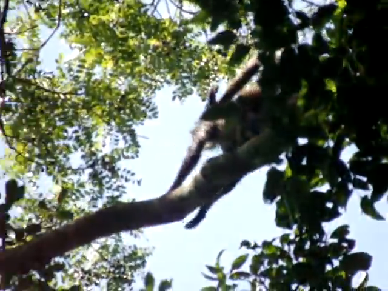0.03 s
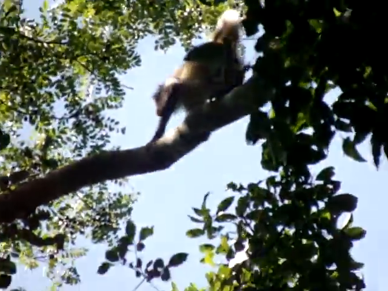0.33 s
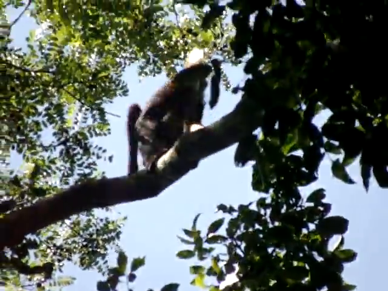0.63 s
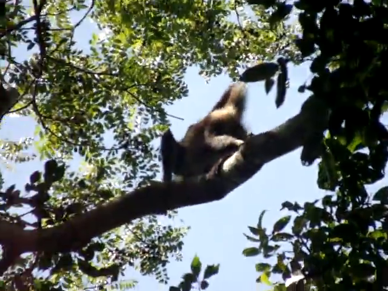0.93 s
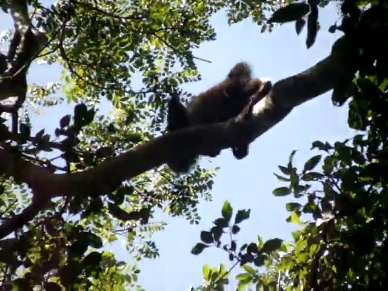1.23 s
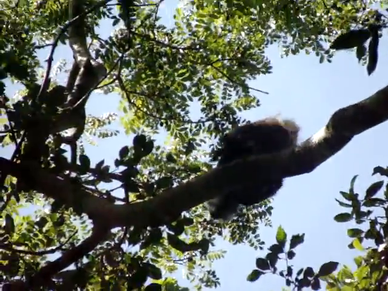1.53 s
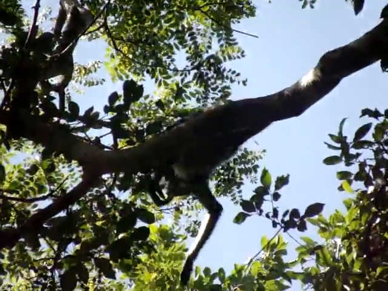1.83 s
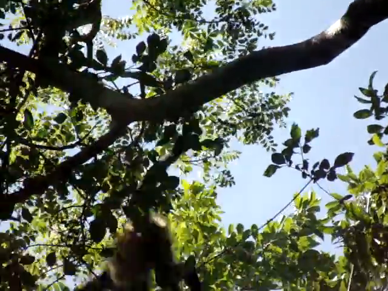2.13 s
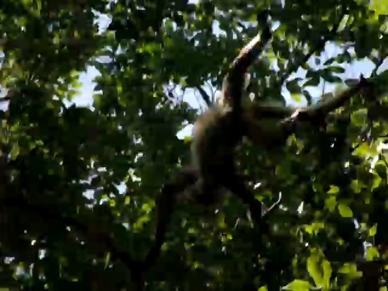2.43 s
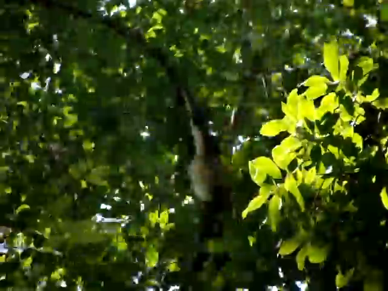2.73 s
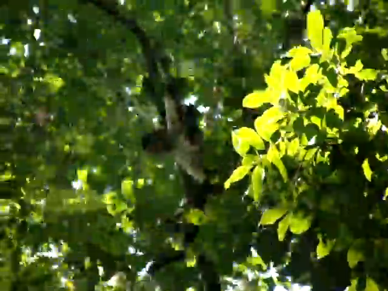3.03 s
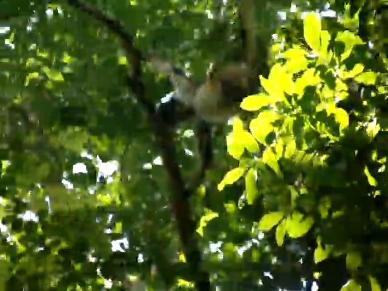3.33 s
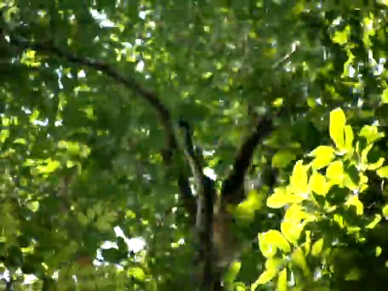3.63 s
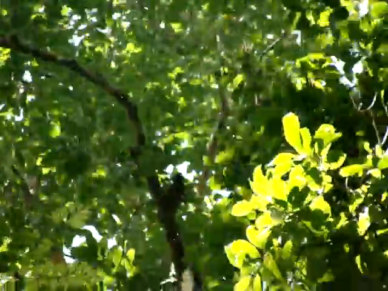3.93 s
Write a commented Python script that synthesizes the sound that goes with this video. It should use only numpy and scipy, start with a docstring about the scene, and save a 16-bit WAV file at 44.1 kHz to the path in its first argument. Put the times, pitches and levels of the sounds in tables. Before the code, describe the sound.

A steady, fluttering cicada buzz, with a few sharp clicks and leaves rustling under a monkey.

```python
"""Cicadas and a monkey in a forest

Cicadas drone: each one's buzz rings near 2 kHz, and echoes among the trees make it flutter.
A monkey runs along a branch and swings into the leaves, which rustle and swish.
Woody ticks and sharp clicks sound close by, over soft forest air and a faint small insect."""
import sys
import numpy as np
from scipy import signal
from scipy.fft import rfft, irfft
from scipy.io import wavfile
from scipy.ndimage import uniform_filter1d, map_coordinates

SR = 44100
rng = np.random.default_rng(int(sys.argv[2]) if len(sys.argv) > 2 else 0)


def generate_wav(sig):
    """Save sig (samples, or channels by samples) to the path in sys.argv[1] as 16-bit PCM at SR."""
    pcm = np.round(np.clip(np.atleast_2d(sig).T, -1, 1) * 32767).astype(np.int16)
    wavfile.write(sys.argv[1], SR, pcm)


N = 176400  # 4 seconds

# tone of the forest air: frequency_hz, gain_db
AIR_TONE = [(20, -20), (50, -8.5), (62, -4), (76, -5.5), (150, -4), (320, 0), (520, -0.5), (615, 4),
            (740, -1), (1050, 2), (1700, -1.5), (3000, -1), (4800, -6.5), (6500, -12.5), (8200, -14.5),
            (10000, -17.5)]
# tone of a soft, low rush in the air: frequency_hz, gain_db
RUSH_TONE = [(120, -24), (280, -3.5), (400, 3), (600, -5), (1200, -25)]
# brief buzzes of a small insect: middle_s, length_s, level_db
INSECT_BUZZES = [(0.327, .22, -63.5), (1.12, 0.11, -62)]
# thin tone of those buzzes: frequency_hz, gain_db
INSECT_TONE = [(7000, -30), (7900, 1), (8200, -8), (8550, 1), (9300, -17)]
# tone of the far cicada chorus: frequency_hz, gain_db
CHORUS_TONE = [(1500, -34), (1830, -6.5), (1920, 4), (2000, 0.5), (2130, 5.5), (2330, 4.5), (2450, -5),
               (2630, -3.5), (2850, -10.5), (3600, -44.5)]
# cicadas that hold one pitch: pitch_hz, start_level_db, end_level_db
STEADY_CICADAS = [(2110, -54, -55.5), (2116, -50.5, -63.5), (2157, -53, -48.5), (2290, -63.5, -55.5),
                  (2366, -65, -55.5), (2374, -61.5, -58), (2568, -60, -57), (2705, -62.5, -58.5)]
# song of the nearest cicada: time_s, pitch_hz, level_db
NEAR_SONG = [(0, 2062, -43), (.3, 2095, -43.5), (.7, 2140, -39.5), (1.0, 2155, -42), (1.2, 2176, -39.5),
             (1.5, 2175, -41.5), (1.7, 2130, -40), (2, 2153, -43), (2.35, 2136, -42), (2.48, 2142, -40.5),
             (2.64, 2149, -40), (2.8, 2144, -47), (2.98, 2152, -37.5), (3.15, 2146, -44),
             (3.55, 2143, -43.5), (3.74, 2147, -41), (4, 2150, -44)]
# the tones in its buzz: multiple_of_buzz_rate, gain_db
NEAR_HARMONICS = [(8, -14.5), (9, -2), (10, -22), (11, -17.5)]
# woody ticks: start_s, level_db, middle_pitch_hz
WOODY_TICKS = [(.164, -35.5, 890), (.5898, -24, 1520), (.772, -34, 1010), (.879, -35, 990),
               (1.063, -38, 1330), (1.2287, -23, 1457), (1.279, -35.5, 1150), (2.2, -36, 770),
               (2.456, -34, 1100), (3.892, -46, 1300)]
# sharp clicks, one much louder than the rest: start_s, level_db
SHARP_CLICKS = [(.733, -38.5), (1.706, -33), (1.71, -16.5), (3.899, -39), (3.917, -43)]
# the tones a click rings with: pitch_hz, gain_db, fade_s
CLICK_RING = [(554, -0.5, 0.0058), (885, -10, 0.013), (2360, -6, 0.017), (3180, -1.5, 0.013),
              (3540, -8.5, 0.016), (4340, -14.5, 0.011), (4820, -2.5, 0.0092), (7210, -15, 0.013),
              (7860, -5.5, 0.0074), (8800, -5.5, 0.01), (9450, -31, .008)]
# how loudly the leaves rustle: time_s, level_db
RUSTLE_LEVELS = [(0, -80), (.55, -58), (.9, -53.5), (1.05, -49.5), (1.25, -62), (1.6, -75), (1.98, -59),
                 (2.13, -46.5), (2.35, -49), (2.55, -46), (2.85, -45), (3.08, -44.5), (3.22, -41.5),
                 (3.45, -45.5), (3.7, -45.5), (4, -51.5)]
# tone of the rustle: frequency_hz, gain_db
RUSTLE_TONE = [(200, -27.5), (700, -7.5), (1600, -10), (3200, 1), (4900, 1), (6500, -7.5), (8000, -12),
               (10000, -14)]
# swishes of whipping branches: start_s, level_db, fade_s
BRANCH_SWISHES = [(2.378, -37, 0.38), (2.653, -36, 0.69), (3.185, -38, 0.22)]
# tone of a swish: frequency_hz, gain_db
SWISH_TONE = [(500, -21), (2000, -7.5), (3700, 2.5), (5200, 2), (7000, -9), (10000, -10)]


def amp(db):
    """Turn decibels into a number to multiply by."""
    return 10 ** (np.asarray(db) / 20)


def unit(x):
    """Scale a signal to an average (rms) level of 1."""
    return x / np.sqrt(np.mean(np.abs(x) ** 2) + 1e-20)


def clock():
    """The time of every sample, in seconds."""
    return np.arange(N) / SR


def curves(rows):
    """Join a table's points with lines: one curve for each column after the time."""
    times, *columns = np.transpose(rows)
    return [np.interp(clock(), times, column) for column in columns]


def wobble(rate_hz):
    """A smooth curve through rate_hz random values a second."""
    return map_coordinates(rng.standard_normal(4096), [clock() * rate_hz + 2], mode="wrap")


def fade(t, fade_s):
    """Die away by 60 dB in fade_s seconds."""
    return np.exp(-np.log(1000) * t / fade_s)


def swell(middle_s, length_s):
    """A smooth rise and fall, loudest at middle_s."""
    return np.exp(-(2 * (clock() - middle_s) / length_s) ** 2)


def colour(x, tone):
    """Shape the lows and highs of x with a tone table, then scale it to level 1."""
    table_hz, table_db = np.transpose(tone)
    hz = np.fft.rfftfreq(N, 1 / SR)
    gain = amp(np.interp(np.log(hz + 1), np.log(table_hz), table_db))
    return unit(irfft(rfft(x) * gain, N))


def patchy_noise(depth_db):
    """Hiss with random louder and softer patches across pitch and time."""
    spectrum = signal.stft(rng.standard_normal(N), nperseg=512)[2]
    patches = uniform_filter1d(rng.standard_normal(spectrum.shape), size=5, axis=0)
    patches = uniform_filter1d(patches, size=7, axis=1)
    return unit(signal.istft(spectrum * amp(depth_db * unit(patches)), nperseg=512)[1][:N])


def add(track, start_s, sound):
    """Mix a sound into the track at start_s."""
    part = track[round(start_s * SR):][:len(sound)]
    part += sound[:len(part)]


def forest_air():
    """The soft wash of the wider forest, with one low rush."""
    wash_db = -48 + 0.21 * wobble(rate_hz=7.66)
    wash = amp(wash_db) * colour(patchy_noise(depth_db=1.6), AIR_TONE)
    rush = swell(middle_s=0.26, length_s=0.37) * colour(rng.standard_normal(N), RUSH_TONE)
    return wash + amp(-55.5) * rush


def small_insect():
    """Short, faint buzzes high above the cicadas."""
    loudness = sum(amp(db) * swell(middle_s, length_s) for middle_s, length_s, db in INSECT_BUZZES)
    return loudness * colour(rng.standard_normal(N), INSECT_TONE)


def echoes(rate_hz):
    """Many echoes added up: a complex curve holding their changing strength and phase."""
    return unit(wobble(rate_hz) + 1j * wobble(rate_hz))


def tone_through_trees(pitch_hz, direct_gain):
    """Echoes boost and cancel a tone, so it flutters. More direct sound means less flutter."""
    flutter = direct_gain + echoes(rate_hz=52.25) + amp(-10.5) * echoes(rate_hz=157.9)
    # keep the average level even over 0.15 s
    flutter /= np.sqrt(uniform_filter1d(np.abs(flutter) ** 2, size=int(0.15 * SR)))
    drift = 0.062 * wobble(rate_hz=8.08)
    cycles = np.cumsum(pitch_hz * np.ones(N)) / SR + drift
    return unit(np.real(flutter * np.exp(2j * np.pi * cycles)))


def cicadas():
    """The nearest cicada speeds up and settles; others hold their pitch over a far chorus."""
    pitch_hz, level_db = curves(NEAR_SONG)
    buzz_hz = pitch_hz / 9  # the loudest tone is 9 times the buzz rate
    nearest = sum(amp(db) * tone_through_trees(buzz_hz * multiple, direct_gain=1.52)
                  for multiple, db in NEAR_HARMONICS)
    others = sum(amp(np.linspace(start_db, end_db, N)) * tone_through_trees(hz, direct_gain=0.71)
                 for hz, start_db, end_db in STEADY_CICADAS)
    chorus = amp(-47) * colour(rng.standard_normal(N), CHORUS_TONE)
    return amp(level_db) * nearest + others + chorus


def woody_ticks():
    """Each tick rings for a few cycles while its pitch drops."""
    rise_s, drop_s = 0.0015, 0.0031
    out, t = np.zeros(N), np.arange(SR // 20) / SR
    pitch_drop = 1 + 0.56 * (np.exp(-t / drop_s) - 0.5)
    for start_s, db, hz in WOODY_TICKS:
        phase = 2 * np.pi * np.cumsum(hz * pitch_drop) / SR
        body = 2 * np.sin(phase) * (1 - np.exp(-(t / rise_s) ** 2))
        overtone = amp(-8.5) * np.sin(2.2 * phase)
        add(out, start_s, amp(db) * fade(t, fade_s=0.015) * (body + overtone))
    return out


def sharp_clicks():
    """Each click is a dry crack with a very short ring and no bass."""
    rise_s, bass_cut_hz = 0.00013, 700
    out, t = np.zeros(N), np.arange(SR // 20) / SR
    for start_s, db in SHARP_CLICKS:
        ring = sum(amp(gain_db) * fade(t, fade_s) * np.sin(2 * np.pi * (hz * t + rng.random()))
                   for hz, gain_db, fade_s in CLICK_RING)
        crack = amp(-2.5) * fade(t, fade_s=0.0081) * rng.standard_normal(len(t))
        add(out, start_s, amp(db) * (1 - np.exp(-t / rise_s)) * (ring + crack))
    return signal.sosfilt(signal.butter(2, bass_cut_hz, "high", fs=SR, output="sos"), out)


def leaves_touching():
    """Leaves brush together softly, with sharper crackles mixed in."""
    crackles_per_s, spread_db = 2000, 1
    crackles = (rng.random(N) < crackles_per_s / SR) * rng.standard_normal(N)
    crackles *= amp(spread_db * rng.standard_normal(N))
    return patchy_noise(depth_db=1.5) + amp(-6.5) * unit(crackles)


def monkey_in_leaves():
    """Leaves rustle as the monkey moves and swish as branches whip; shaking twigs add a shiver."""
    level_db, = curves(RUSTLE_LEVELS)
    rustle = amp(level_db) * colour(leaves_touching(), RUSTLE_TONE)
    rise_s = 0.013
    whip = np.zeros(N)
    for start_s, db, fade_s in BRANCH_SWISHES:
        t = np.maximum(clock() - start_s, 0)
        whip += amp(db) * (1 - np.exp(-t / rise_s)) * fade(t, fade_s)
    shiver = amp(wobble(rate_hz=53.53))  # about 1 dB up and down
    swish = whip * colour(leaves_touching(), SWISH_TONE)
    return shiver * (rustle + swish)


def scene():
    """Add all the sounds together in one channel."""
    mix = cicadas() + small_insect() + monkey_in_leaves() + woody_ticks() + sharp_clicks() + forest_air()
    return mix[None]


def record(dry):
    """Cut away the highest treble, above about 10 kHz."""
    top_hz, edge_hz = 10080, 200
    hz = np.fft.rfftfreq(2 * N, 1 / SR)
    gain = np.clip((top_hz - hz) / edge_hz + 0.5, 0, 1)
    return irfft(rfft(dry, 2 * N) * gain)[..., :N]


dry = scene()
out = record(dry)
generate_wav(out)
```